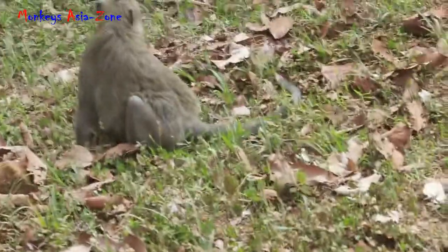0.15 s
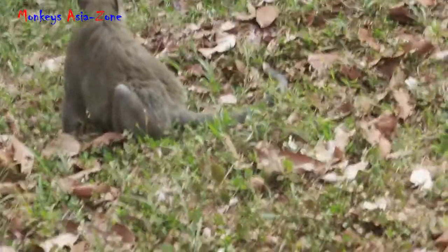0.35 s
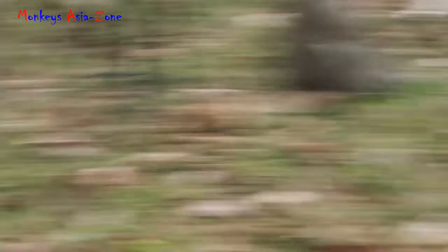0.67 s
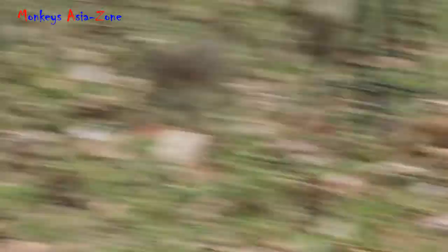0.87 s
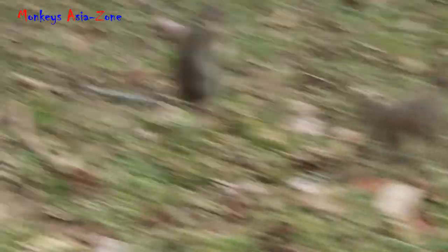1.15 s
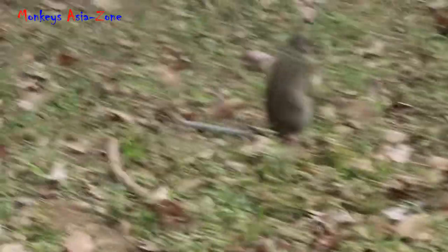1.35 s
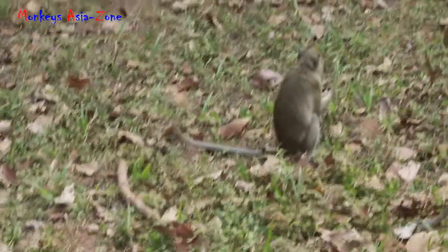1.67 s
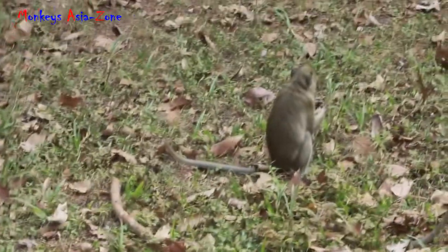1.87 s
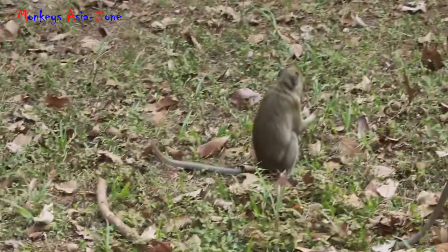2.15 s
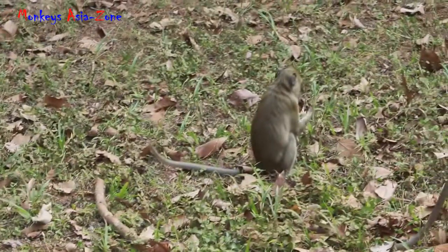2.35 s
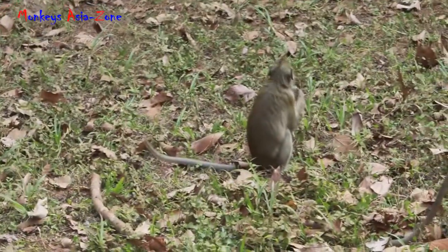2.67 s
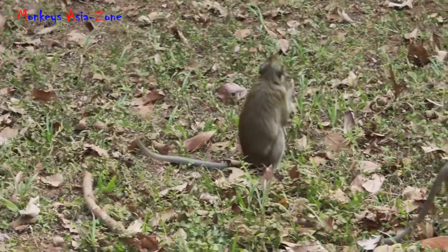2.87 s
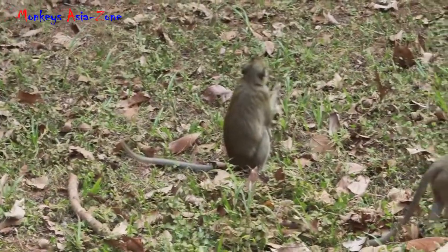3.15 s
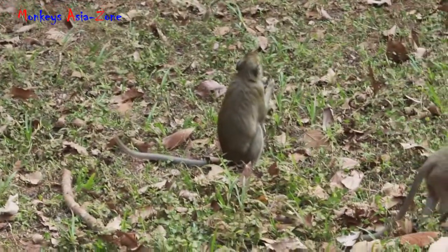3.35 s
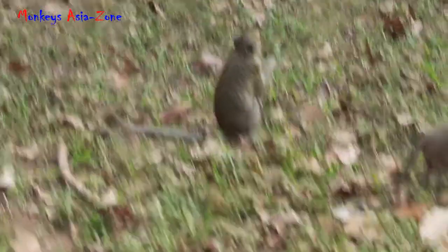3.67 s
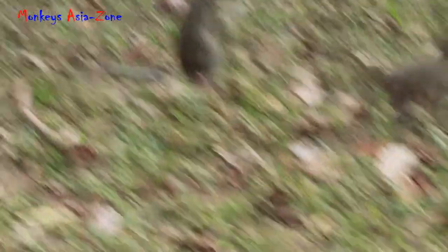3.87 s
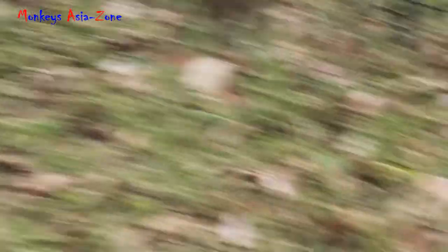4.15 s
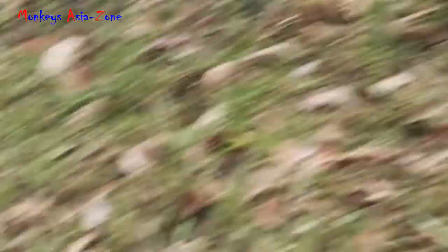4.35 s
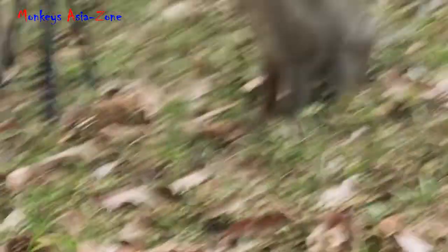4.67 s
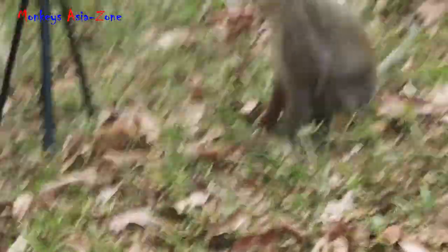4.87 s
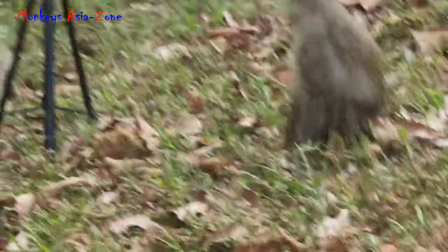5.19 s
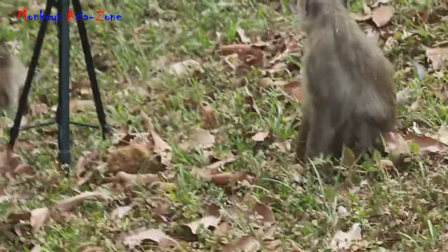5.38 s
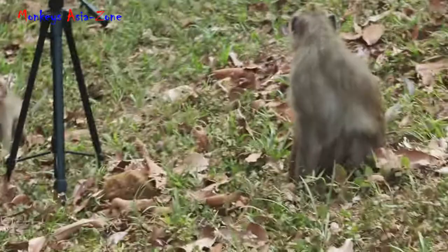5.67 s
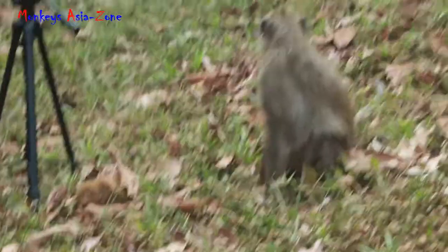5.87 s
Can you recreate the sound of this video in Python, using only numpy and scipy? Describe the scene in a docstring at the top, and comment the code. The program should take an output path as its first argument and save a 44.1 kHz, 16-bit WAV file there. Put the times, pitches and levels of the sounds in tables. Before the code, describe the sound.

A quiet outdoor bed of low rumble, dull thumps and crackling leafy hiss continues for about six seconds, with faint echo from trees. At 0.4 s a short breathy monkey squeal falls away on the left. Soft coos and a thin insect note follow around 0.7-1.1 s, weak barks and a rising coo at 1.5-1.7 s, then a raspy scream at 1.85 s. Tiny low grunts patter at 2.4 s. From 2.67 to 3.17 s comes the longest outburst: piercing, wavering, torn by rasp, dropping sharply at its end, with hiss swelling. A faint yelp at 3.45 s precedes short screams at 3.6-4.15 s and a very high shriek at 4.25-4.4 s. A hollow knock sounds at 4.5 s, with dry snaps until 4.83 s. Coos, a rising nasal whine, gruff barks and a thin squeal occupy 5.15-5.75 s, the barks leftward; a faint insect note ends it. Close handheld stereo microphone.

```python
"""A bed of low rumble and crackling hiss stirs over a lawn; then macaques squabble metres from a hand-held camera.
Their screams are gliding whistles that break to a lower register and tear into rasp, built from sines and shaped noise.
Chirps, coos, a whine and a squeal are bent tones and harmonics; barks and grunts are pulses and puffs through a throat.
Dull low thumps and swells of hiss are shaped noise, something knocks once on ringing modes, an insect sings a thin note,
and the trees around give a faint echo of scattered taps."""
import sys
import numpy as np
from scipy import signal
from scipy.fft import rfft, irfft, next_fast_len
from scipy.io import wavfile
from scipy.ndimage import uniform_filter1d

SR = 44100
rng = np.random.default_rng(int(sys.argv[2]) if len(sys.argv) > 2 else 0)


def generate_wav(signal):
    """Clip the signal to [-1, 1] and save it as 16-bit WAV at the path in sys.argv[1]."""
    frames = np.transpose(np.atleast_2d(signal))
    scaled = np.clip(frames, -1, 1) * 32767
    pcm = np.round(scaled).astype(np.int16)
    wavfile.write(sys.argv[1], SR, pcm)


N = 265471  # length in samples
EDGE_HZ = 15650  # top of the camera's band


def amp(db):
    """Amplitude of a level in dB."""
    return 10 ** (np.asarray(db) / 20)


def evened(x):
    """Sets the rms to 1."""
    return x / np.sqrt(np.mean(x ** 2) + 1e-20)


def read(points, hz):
    """A spectrum joined by straight lines over log frequency."""
    f, value = np.transpose(points)
    return np.interp(np.log(hz + 1), np.log(f + 1), value)


def add(mix, s, sound):
    """Lays a stereo sound into the mix from s seconds on."""
    part = mix[:, max(round(s * SR), 0):][:, :sound.shape[1]]
    part += sound[:, :part.shape[1]]


def coloured(x, gain):
    """Filters x by gain(Hz) and sets its rms to 1."""
    size = next_fast_len(x.shape[-1] + 512)
    spectrum = rfft(x, size) * gain(np.fft.rfftfreq(size, 1 / SR))
    return evened(irfft(spectrum, size)[..., :x.shape[-1]])


def wobble(size, hz):
    """Random motion up to about hz, rms 1."""
    return coloured(rng.standard_normal(size), lambda f: 1 / (1 + (f / hz) ** 4))


def controls(rows):
    """Time and every column of a curve table at audio rate."""
    s, *columns = np.transpose(rows)
    t = np.arange(s[0], s[-1], 1 / SR)
    return [t] + [np.interp(t, s, c) for c in columns]


def fade(size, edge_s):
    """Soft start and stop."""
    t = np.arange(size) / SR
    return np.clip(np.minimum(t, t[::-1]) / edge_s, 0, 1)


def arc(length, first_hz, middle_hz, last_hz):
    """The pitch of a short call bends smoothly through three notes."""
    u = np.linspace(0, 1, int(length * SR))
    return np.polyval(np.polyfit([0, .5, 1], [first_hz, middle_hz, last_hz], 2), u)


def swells(rows):
    """Power of overlapping swells that each rise and fall; rows are (middle s, length s, dB)."""
    t = np.arange(N) / SR
    return sum((amp(db) * np.cos(np.pi * np.clip((t - s) / length, -.5, .5))) ** 2 for s, length, db in rows)


def placed(s, x):
    """Sound from the side reaches one microphone port earlier and louder."""
    # Where the callers are. Each row: time in seconds, lead of the left port in microseconds,
    # left-right level in dB, in full from 4 kHz up.
    bearing = [(.4, 90, 8.5), (1.5, -22, -1), (1.85, -46, 0), (2.67, -49, -1), (3.6, -35.5, -1),
               (3.87, 14, 0), (4.251, 1, 1.5), (5.2, 36, 1), (5.55, 37, 6)]
    at, lead, balance = np.transpose(bearing)
    size = next_fast_len(len(x) + 64)
    f = np.fft.rfftfreq(size, 1 / SR)
    earlier = np.exp(1j * np.pi * f * np.interp(s, at, lead) / 10 ** 6)
    louder = amp(np.interp(s, at, balance) / 2 * np.minimum(f / 4000, 1))
    half = earlier * louder  # each port takes half the difference
    return s, irfft(rfft(x, size) * np.array([half, 1 / half]), size)[:, :len(x)]


def restless_bed(shape, apart, grain, crackles_per_s, restless_db):
    """Stereo hiss and random crackles of uneven size, coloured by a spectrum and restless in level."""
    sizes = amp(4 * np.minimum(rng.exponential(1, (3, N)), 3))
    struck = rng.random((3, N)) < crackles_per_s / SR
    crackles = sizes * rng.choice([-1, 1], (3, N)) * struck
    x = rng.standard_normal((3, N)) + grain * evened(crackles)
    x = x * np.exp(0.11 * wobble(N, 43)) * amp(restless_db * wobble(N, 8.3))
    # one track is common to both ports, the others belong to one port each
    return coloured(x[0] + apart * x[1:], lambda f: amp(read(shape, f)))


def lawn(crackles_per_s=260, crackle=0.5, restless_db=0.58):
    """The bed over the lawn: low rumble, soft hiss and bright crackling hiss, each with its own swells."""
    # Dull low thumps, mostly under the screams. Each row: middle in seconds, length in seconds, level in dB.
    low_thumps = [(.46, 0.13, -48), (.98, 0.1, -58), (2.46, 0.18, -54), (3.04, 0.26, -50),
                  (3.71, 0.14, -48.5), (3.88, 0.16, -55.5), (4.31, 0.072, -44.5), (5.54, 0.14, -57)]
    # Swells of broad hiss, the strongest accompanying the long scream. Each row: middle in seconds,
    # length in seconds, soft hiss in dB, bright hiss in dB.
    hiss_swells = [(0.037, 0.42, -76, -49.5), (0.815, 0.34, -56.5, -50), (1.183, 0.046, -52.5, -71),
                   (1.325, 0.073, -61, -49), (1.557, 0.19, -48.5, -59), (1.955, .4, -57, -41.5),
                   (2.455, 0.16, -50, -46.5), (2.994, 0.36, -49, -29.5), (3.27, 0.33, -56, -43),
                   (3.75, 0.35, -56.5, -37), (4.308, 0.12, -40, -38), (4.59, 0.44, -44.5, -41.5),
                   (5.176, 0.28, -44, -46.5), (5.345, 0.67, -48, -40.5)]
    # Spectrum of the rumble and thumps. Each row: frequency in Hz, level in dB.
    rumble_shape = [(12, -39), (20, -9.5), (65, -5), (108, 3), (145, -1.5), (189, -4.5), (300, -8.5),
                    (390, -34), (660, -120)]
    # Spectrum of the soft hiss. Each row: frequency in Hz, level in dB.
    soft_shape = [(120, -19), (260, 1), (600, 1.5), (1200, -2), (2500, -10.5), (4000, -12.5), (9000, -42)]
    # Spectrum of the bright hiss. Each row: frequency in Hz, level in dB.
    bright_shape = [(800, -8), (2000, 0.5), (4000, 0.5), (6500, -2), (9000, -4), (12000, -7), (14000, -14),
                    (16000, -26)]
    rumble_db, soft_db = -56.5, -54.5  # the bed between swells
    bright_first_db, bright_last_db = -53.5, -45  # the bright hiss grows louder from start to end

    soft_swells = swells((s, length, db) for s, length, db, _ in hiss_swells)
    bright_swells = swells((s, length, db) for s, length, _, db in hiss_swells)
    rumble = np.sqrt(amp(rumble_db) ** 2 + swells(low_thumps))
    soft = np.sqrt(amp(soft_db) ** 2 + soft_swells)
    bright = np.sqrt(amp(np.linspace(bright_first_db, bright_last_db, N)) ** 2 + bright_swells)
    rumble_sound = rumble * restless_bed(rumble_shape, 0.59, 0, crackles_per_s, restless_db)
    soft_sound = soft * restless_bed(soft_shape, 1.0, 0.47, crackles_per_s, restless_db)
    bright_sound = bright * restless_bed(bright_shape, 6.3, crackle, crackles_per_s, restless_db)
    return rumble_sound + soft_sound + bright_sound


def trees(x, near_db=-16, near_t60=0.077, far_db=-16):
    """Quick scatter from ground and trunks, then a faint long tail from the foliage all around."""
    # How long the foliage rings. Each row: frequency in Hz, decay by 60 dB in seconds.
    echo_t60 = [(200, 0.24), (1500, 0.69), (3200, 0.96), (6500, 0.84), (10000, 0.8), (15000, 0.17)]
    # Colour of the foliage. Each row: frequency in Hz, level in dB.
    echo_colour = [(200, -10), (1200, 0.5), (2100, -2), (3100, 3.5), (4200, -2), (6400, 2.5), (8500, -2.5),
                   (15000, -5.5)]
    taps = rng.standard_normal((4, SR)) * (rng.random((4, SR)) < 3000 / SR)
    taps[:, :SR // 300] = 0  # nothing stands close enough to answer sooner
    hz, t, z = signal.stft(taps, SR, nperseg=256)
    decay_db = read(echo_colour, hz)[:, None] - 60 * t / read(echo_t60, hz)[:, None]
    onset = np.minimum(t / 0.019, 1)
    far = signal.istft(z * amp(decay_db) * onset, SR, nperseg=256)[1][:, :SR]
    near = taps[:2] * amp(-60 * np.arange(SR) / SR / near_t60)
    # every port hears the foliage answer both channels
    far_paths = far.reshape(2, 2, SR) / np.linalg.norm(far[:2])
    foliage = signal.fftconvolve(x[None], far_paths, axes=2).sum(1)
    ground = signal.fftconvolve(x, near / np.linalg.norm(near[0]), axes=1)
    return (amp(far_db) * foliage + amp(near_db) * ground)[:, :N]


def insect(s, length, db):
    """A thin note from the grass: one sine with slight random motion in pitch and level."""
    insect_hz = 5700
    size = int(length * SR)
    phase = 2 * np.pi * np.cumsum(insect_hz + 35 * wobble(size, 132)) / SR
    note = np.sin(phase) * np.exp(0.51 * wobble(size, 40))
    return placed(s, amp(db) * evened(note) * fade(size, 0.021))


def snap(s, db, hz, t60=0.018):
    """A dry leaf or twig cracks: a narrow band of noise that dies at once."""
    t = np.arange(SR // 25) / SR
    band = lambda f: 1 / (1 + ((f - hz) / (0.13 * hz)) ** 2)
    crack = coloured(rng.standard_normal((2, len(t))), band) * amp(-60 * t / t60)
    return s, amp(db) * crack / abs(crack).max()


def knock(s, db, scuff_db=-11, scuff_t60=0.093):
    """A dull blow on something hollow: decaying modes with a short scuff of noise."""
    # Ring of the hollow thing. Each row: frequency in Hz, level in dB, decay by 60 dB in seconds.
    modes = [(293, -11.5, 0.077), (372, -4, 0.078), (486, -3.5, 0.11), (744, 4, 0.049), (854, -4, 0.05),
             (1750, -3, 0.068), (2620, -2.5, 0.022)]
    t = np.arange(SR // 5) / SR
    ring = sum(amp(level - 60 * t / t60) * np.sin(2 * np.pi * (hz * t + rng.random()))
               for hz, level, t60 in modes)
    scuff = coloured(rng.standard_normal((2, len(t))), lambda f: 1 / (1 + (f / 1300) ** 2))
    scuff = scuff * amp(scuff_db - 60 * t / scuff_t60)
    return s, amp(db) * (ring / abs(ring).max() + scuff) * fade(len(t), 0.00092)


def bark(row, throat, taper, upper_hz=4080, upper_width_hz=280, arch=0.042):
    """A short burst of uneven pulses and puffs of air through a throat; the pitch arches with the push."""
    s, length, db, first_hz, last_hz, rough, brightness_db, upper_db = row
    size, rough = int(length * SR), np.clip(rough, 0, 1)
    push = signal.windows.tukey(size, taper)
    unsteady = 1 + arch * (push - 1) + 0.082 * rough * wobble(size, 400)
    turns = np.cumsum(np.linspace(first_hz, last_hz, size) * unsteady) / SR
    folds = sum(np.cos(2 * np.pi * k * turns) for k in range(1, 21))
    # air bursts out at the start of each cycle
    puffs = (0.48 + np.exp(-(turns % 1) / 0.36)) * rng.standard_normal(size)
    drive = np.sqrt(1 - rough) * evened(folds) + np.sqrt(rough) * evened(puffs)

    def colour(f):
        upper = upper_db / (1 + ((f - upper_hz) / upper_width_hz) ** 2)
        return amp(read(throat, f) + brightness_db * np.log2(f + 100) + upper)
    return placed(s, amp(db) * coloured(drive * push, colour))


def hum(hz, mouth, throat, closed_slope_db=-10, jitter=0.0138, blur=0.079, patchy_db=2.5):
    """A stack of harmonics: mostly fundamental with the lips closed, a grainy nasal whine with them open."""
    size = len(hz)
    phase = 2 * np.pi * np.cumsum(hz * (1 + jitter * wobble(size, 135))) / SR
    mouth, voice, power = np.clip(mouth, 0, 1), 0, 0
    for k in range(1, 13):
        closed = amp(closed_slope_db * 2 * np.log2(k))
        opened = amp(read(throat, k * hz))
        gain = ((1 - mouth) * closed + mouth * opened) * (k * hz < EDGE_HZ)
        grain = amp(patchy_db * mouth * wobble(size, 57))
        partial = grain * np.sin(k * phase + blur * k * mouth * wobble(size, 400))
        voice, power = voice + gain * partial, power + gain ** 2 / 2
    return voice / np.sqrt(power)


def coo(s, length, db, first_hz, middle_hz, last_hz, mouth, edge_db=-8):
    """A soft call of bending pitch, a hum loudest in the middle."""
    # Throat of the coos. Each row: frequency in Hz, level in dB.
    coo_throat = [(600, -11), (1100, -18), (1650, -2), (1950, -2), (2250, -0.5), (3200, -20), (4150, -1),
                  (5200, -20), (7000, -21), (10000, -19), (15000, -34)]
    hz = arc(length, first_hz, middle_hz, last_hz)
    level = amp(db + edge_db * np.linspace(-1, 1, len(hz)) ** 2)
    return placed(s, level * hum(hz, mouth, coo_throat) * fade(len(hz), 0.009))


def whine(rows, mouth=.92):
    """A nasal call that climbs with the mouth open."""
    # Throat of the whine. Each row: frequency in Hz, level in dB.
    whine_throat = [(600, -7), (1200, -27), (1650, 1), (2100, -9), (2700, 3.5), (3300, -1), (3900, -19),
                    (4500, -6), (5300, -23), (6700, -11), (10000, -15), (15000, -30)]
    t, hz, db = controls(rows)
    voice = hum(hz, mouth, whine_throat, jitter=.008, blur=.05, patchy_db=2.4)
    return placed(t[0], amp(db) * voice * fade(len(t), 0.01))


def whistle(hz, tone_db, octave_db, jitter, shimmer, third_db, half_db):
    """Folds vibrating almost as a sine; unsteady cycles widen the line, alternate strong ones add half lines."""
    size = len(hz)
    phase = 2 * np.pi * np.cumsum(hz * (1 + jitter * wobble(size, 574))) / SR
    partials = [(1, tone_db), (2, octave_db), (3, octave_db + third_db),
                (1 / 2, tone_db + half_db), (3 / 2, tone_db + half_db)]
    voice = sum(amp(db) * (k * hz < EDGE_HZ) * np.sin(k * phase) for k, db in partials)
    return np.sqrt(2) * voice * evened(np.exp(shimmer * wobble(size, 186)))


def chirp(s, length, db, first_hz, middle_hz, last_hz, octave_db, taper=0.73):
    """A brief unsteady whistle that swells and dies along one bend of pitch."""
    hz = arc(length, first_hz, middle_hz, last_hz)
    tone = whistle(hz, db, db + octave_db, jitter=0.033, shimmer=0.35, third_db=-12, half_db=-25)
    return placed(s, tone * signal.windows.tukey(len(hz), taper))


def squeal(rows, first_octave_db=-15, last_octave_db=5):
    """A whistle with no rasp, whose octave grows against its fundamental as it goes on."""
    t, hz, db = controls(rows)
    octave_db = db + np.linspace(first_octave_db, last_octave_db, len(t))
    tone = whistle(hz, db, octave_db, jitter=0.005, shimmer=.12, third_db=-16, half_db=-40)
    return placed(t[0], tone * fade(len(t), 0.005))


def strands(hz, jitter=0.01377, blur=0.64, patchy_db=7.5, quarter_db=-4):
    """Chaotic folds: the cycle doubles twice, leaving ragged lines at quarters of the pitch that glide with it."""
    size, voice = len(hz), 0
    phase = 2 * np.pi * np.cumsum(hz * (1 + jitter * wobble(size, 149.7))) / SR
    for k in np.arange(2, 4 * EDGE_HZ / hz.min()) / 4:
        db = patchy_db * wobble(size, 29.4) + quarter_db * (2 * k % 1 > 0)  # odd quarters differ in level
        line = np.sin(k * phase + blur * wobble(size, 410))
        voice = voice + amp(db) * (k * hz < EDGE_HZ) * line
    return evened(voice * np.sqrt(hz))


def torn(x, patchy_db=3.5, frames_size=7, bins_size=4):
    """Chaos tears a sound into patches about ten milliseconds long and a few hundred Hz wide."""
    z = signal.stft(x, nperseg=256, noverlap=192)[2]
    patches = uniform_filter1d(rng.standard_normal(z.shape), size=frames_size, axis=1)
    patches = evened(uniform_filter1d(patches, size=bins_size, axis=0))
    z = z * amp(patchy_db * np.clip(patches, -2, 2))
    return evened(signal.istft(z, nperseg=256, noverlap=192)[1][:len(x)])


def scream(rows, voice, split_hz=5000, flutter=0.19, break_hz=3300, stray_db=-7, tearing_jitter=0.011):
    """A whistle, pure when high and unsteady when it breaks low; roughness turns its effort into fluttering rasp."""
    # Throat that colours the rasp. Each row: frequency in Hz, level in dB.
    scream_throat = [(200, -11), (900, -10), (1600, -8), (2400, -5), (3200, -4), (3800, -3), (4700, 3),
                     (5500, 3.5), (6500, 7), (7500, 5.5), (9300, 4.5), (10800, -1.5), (13000, -6),
                     (16000, -4.5)]
    attack_s, release_s = .003, 0.0073
    rasp_pivot_hz, rasp_darkens_db_per_octave = 3970, 5  # the lower the pitch, the darker the rasp
    air_hz, air_darkens_db_per_octave = 8500, 1  # the top of the rasp fades further as the pitch falls
    octave_limit_hz = 12400  # the throat damps the octave above this

    t, hz, effort_db, rough = controls(rows)
    hiss, high_jitter, low_jitter, high_octave_db, low_octave_db, low_rasp_db = voice
    size, hiss, rough = len(t), np.clip(hiss, 0, 1), np.clip(rough, .02, .98)
    shares = np.array([1 - rough, rough]) / np.hypot(1 - rough, rough)
    tone_db, rasp_db = effort_db + 20 * np.log10(shares)

    broken = 1 / (1 + (hz / break_hz) ** 6)
    low_register = 1 / (1 + (hz / break_hz / 1.02) ** 14)
    octave_db = effort_db + high_octave_db + low_register * (low_octave_db - high_octave_db)
    octave_db = octave_db - 10 * np.log10(1 + (2 * hz / octave_limit_hz) ** 40)
    # the whistle drops out while the voice jumps between registers
    octaves_per_s = abs(np.gradient(np.log2(hz))) * SR
    held = uniform_filter1d(1 / (1 + (octaves_per_s / 90) ** 4), size=60)
    jitter = high_jitter + low_register * (low_jitter - high_jitter) + tearing_jitter * rough ** 2
    tone = held * whistle(hz, tone_db, octave_db, jitter, 0.17 + 0.2 * broken, third_db=-16, half_db=-36)

    plain_hiss = torn(rng.standard_normal(size))
    drive = np.sqrt(1 - hiss) * strands(hz) + np.sqrt(hiss) * plain_hiss
    drive = drive * np.exp(flutter * wobble(size, 500))
    lower = lambda f: 1 / (1 + (f / split_hz) ** 8)
    darkness = amp(low_rasp_db - rasp_darkens_db_per_octave * np.log2(hz / rasp_pivot_hz))
    treble = amp(rasp_db) / np.hypot(1, darkness)
    dark = darkness * treble * coloured(drive, lambda f: amp(read(scream_throat, f)) * lower(f))
    bright = treble * coloured(drive, lambda f: amp(read(scream_throat, f)) * (1 - lower(f)))
    air = signal.sosfiltfilt(signal.butter(2, air_hz, "high", fs=SR, output="sos"), bright)
    air_loss = 1 - amp(air_darkens_db_per_octave * np.log2(hz / hz.max()))
    s, direct = placed(t[0], tone + dark + bright - air_loss * air)

    # short waves scatter off the grass and reach each port differently
    scatter = lambda f: (1 - lower(f)) / (1 + (f / 12500) ** 8)
    stray = amp(stray_db) * treble * coloured(rng.standard_normal((2, size)), scatter)
    attack = np.minimum((t - t[0]) / attack_s, 1)
    release = np.minimum((t[-1] - t) / release_s, 1)
    return s, (direct + stray) * attack * release


def scene():
    """Every call and small noise, with its echo, over the restless bed of the lawn."""
    # Insect notes. Each row: start in seconds, length in seconds, level in dB.
    insect_notes = [(0.922, 0.17, -55.5), (1.089, .13, -64), (4.983, 0.14, -51.5), (5.893, .2, -52)]
    # Snapping leaves and twigs. Each row: start in seconds, peak in dB, centre in Hz.
    snaps = [(.812, -41, 13150), (4.568, -25, 3230), (4.802, -33, 2400), (4.8246, -31, 3840),
             (4.8295, -25.5, 3700)]
    # Knocks. Each row: start in seconds, peak of the ring in dB.
    knocks = [(4.4934, -16)]
    # Low grunts. Each row: start in seconds, length in seconds, level in dB, first and last pitch in Hz
    # at full push, roughness 0-1, brightness in dB per octave, upper resonance in dB.
    grunts = [(2.366, 0.019, -48, 167, 158, 0.11, 0, 0), (2.4, 0.032, -42, 153.5, 139, 0.11, 0, 0),
              (2.441, 0.04, -44, 138, 128, .1, 0.55, 0), (2.496, 0.034, -49, 133.7, 131, .2, .5, 0)]
    # Throat of the grunts. Each row: frequency in Hz, level in dB.
    grunt_throat = [(60, -6), (140, 5.5), (300, -14), (700, -29), (1050, -6.5), (1400, -31), (1850, -11),
                    (3000, -33), (9000, -50)]
    # Barks, with the same columns and units as the grunts.
    barks = [(1.512, 0.043, -45.5, 591, 520, 0.82, 1.5, -9), (1.554, 0.032, -37.5, 740, 561, 0.42, -1, 5),
             (1.587, 0.031, -36.5, 796, 790, 0.24, 2, 12.5), (3.44, .04, -44.5, 540, 574, 0.82, 3.5, -8),
             (5.471, 0.044, -32, 498.3, 494.4, 0.7, -2.5, 6),
             (5.519, .038, -24.5, 611, 569, 0.78, 0.5, 1.5), (5.579, 0.031, -29, 869, 780, 0.2, 0.5, 0),
             (5.616, 0.028, -34.5, 764, 682, 0.32, -1, 0), (5.726, 0.023, -48, 810, 746, 0.96, 1, -4)]
    # Throat of the barks. Each row: frequency in Hz, level in dB.
    bark_throat = [(200, -15), (700, -18), (1150, -15), (1600, 5.5), (2200, -1.5), (3100, -12.5),
                   (4100, -4.5), (5000, -17), (6200, -11), (8000, -17.5), (11000, -16), (16000, -35)]
    # Coos. Each row: start in seconds, length in seconds, level in dB, first, middle and last pitch in Hz,
    # mouth opening 0-1.
    coos = [(0.689, .15, -53, 541, 626, 635, 0.1), (0.824, 0.22, -48.5, 670, 731, 610, .36),
            (1.619, .145, -45, 615, 752, 976, 0.9), (3.415, 0.074, -45.5, 465, 573, 542, 0.56),
            (5.16, .115, -47, 480, 690, 790, .6), (5.29, .29, -46.5, 662, 885, 600, 0.38)]
    # A long rising whine. Each row: time in seconds, pitch in Hz, level in dB.
    whine_curve = [(5.272, 797, -42), (5.287, 818, -35.5), (5.325, 866, -39.5), (5.358, 1070, -38),
                   (5.385, 1334, -32), (5.425, 1605, -47)]
    # Brief side tones and chirps in and around the screams. Each row: start in seconds, length in seconds,
    # level in dB, first, middle and last pitch in Hz, octave against the fundamental in dB.
    chirps = [(1.979, 0.022, -42.5, 1520, 1086, 600, -12), (2.741, 0.046, -43, 1030, 1457, 2090, -3),
              (2.857, 0.044, -25.5, 3970, 4710, 4660, -3), (2.898, 0.033, -30.5, 2520, 2420, 2340, -12),
              (2.941, .046, -25, 5200, 4430, 3320, -18), (2.945, 0.061, -30, 2350, 2400, 2260, 1),
              (2.989, .033, -21.5, 2300, 1935, 1460, -5.5), (3.564, 0.031, -48.5, 1084, 1166, 1550, -10),
              (3.867, 0.071, -46, 1062, 1230, 890, 10), (4.045, 0.061, -29, 2157, 2190, 2120, -6),
              (4.09, 0.0588, -43.5, 1319, 1078, 1040, -10), (4.098, 0.055, -30.5, 2890, 3020, 2450, -20),
              (4.182, 0.047, -46.5, 1005, 1170, 1680, 1), (4.247, .027, -37, 3180, 3900, 4350, -10),
              (4.268, .056, -27.5, 6800, 6320, 6200, -23), (5.414, .025, -35.5, 2350, 2470, 2580, -22)]
    # A clean squeal. Each row: time in seconds, pitch in Hz, level in dB.
    squeal_curve = [(5.555, 4200, -46), (5.595, 5500, -34), (5.615, 5100, -33.5), (5.652, 4050, -45.5),
                    (5.685, 4280, -39), (5.708, 4040, -44.5), (5.722, 3640, -55)]
    # One table a scream. Each row: time in seconds, pitch in Hz, effort in dB, roughness 0-1.
    screams = [
        [(.406, 4510, -32, .35), (.424, 3930, -28, 0.31), (.435, 4050, -36, .33), (.447, 4150, -26.5, 0.13),
         (.454, 4450, -30, .15), (.461, 3980, -23, 0.11), (.49, 4007, -27, 0.12), (.506, 3240, -42, 0.34),
         (.521, 2170, -43, 0.5), (.538, 1690, -46, .9)],
        [(1.838, 5010, -36, 0.7), (1.86, 5485, -27.5, 0.92), (1.885, 6284, -26.5, 0.52),
         (1.908, 6560, -29, 0.35), (1.951, 5180, -36, 0.55), (1.958, 3123, -33, 0.36),
         (1.975, 2760, -27.5, 0.32), (1.995, 2444, -25, 0.44), (2.015, 1730, -38, 0.54)],
        [(2.671, 2100, -23, 0.1), (2.675, 2330, -16.5, 0.1), (2.683, 3330, -27.5, 0.53),
         (2.7, 5860, -28.5, .55), (2.715, 7220, -24.5, 0.45), (2.745, 7390, -23, 0.31), (2.8, 6930, -29, 0.48),
         (2.835, 6720, -40, .55)],
        [(2.835, 6640, -38.5, 0.5), (2.855, 6520, -27.5, 0.3), (2.875, 6710, -23, .72),
         (2.91, 6310, -23.5, .78), (2.93, 6000, -22, 0.62), (2.958, 5236, -19.5, 0.5),
         (2.982, 5493, -24.5, 0.25), (3.003, 4950, -23, 0.3), (3.025, 5000, -24.5, 0.25),
         (3.052, 5990, -25.5, 0.4), (3.098, 6173, -20.5, 0.26), (3.108, 6880, -14.5, 0.75),
         (3.112, 3516, -16.5, 0.6), (3.123, 3270, -17.5, 0.3), (3.14, 2838, -21.5, 0.22),
         (3.166, 2203, -37, 0.5)],
        [(3.436, 1200, -48, .7), (3.46, 1100, -43, 0.5), (3.468, 2700, -44, 0.7), (3.483, 3150, -36, 0.3),
         (3.506, 2900, -47, .7)],
        [(3.6, 2910, -50, 0.65), (3.645, 5320, -37.5, 0.15), (3.661, 6300, -55, .7), (3.666, 6500, -44, .4),
         (3.67, 6450, -30.5, 0.16), (3.692, 6010, -26.5, 0.44), (3.7, 3240, -27.5, 0.9),
         (3.718, 2976, -23, 0.37), (3.735, 2903, -29, 0.72), (3.774, 2650, -33.5, 0.75),
         (3.781, 2415, -26.5, 0.34), (3.802, 2310, -42, 0.9)],
        [(3.868, 1195, -39, 0.9), (3.885, 1772, -22, 0.36), (3.895, 2157, -29.5, .6), (3.907, 2482, -17, 0.11),
         (3.916, 2986, -21.5, .35), (3.932, 2980, -21, .18), (3.947, 3580, -40, 0.8)],
        [(3.95, 4053, -44, 0.5), (3.99, 5005, -31, 0.23), (4.01, 5510, -28, .42), (4.03, 5107, -28, 0.62),
         (4.05, 4980, -22, 0.65), (4.07, 4183, -22.5, 0.5), (4.087, 3410, -23, 0.6), (4.096, 2297, -22.5, 0.4),
         (4.11, 2033, -17.5, .29), (4.13, 2055, -26, 0.24), (4.157, 1470, -32, 0.5)],
        [(4.244, 6410, -30.5, 0.4), (4.272, 7810, -26.5, 0.68), (4.295, 8340, -19.5, 0.68),
         (4.308, 8360, -17.5, 0.32), (4.319, 7800, -16, 0.5), (4.323, 3480, -24.5, 0.93),
         (4.334, 2677, -17.5, 0.25), (4.343, 2344, -25.5, .52), (4.366, 2638, -27, 0.43),
         (4.378, 2640, -21.5, .3), (4.385, 2040, -28.5, 0.65), (4.397, 1640, -36, .75)],
    ]
    # The voice of each scream, in the same order. Each row: share of the rasp that is plain hiss 0-1,
    # pitch jitter in the high and in the low register as fractions, octave in the high and in the low
    # register in dB, low rasp against high rasp in dB.
    voices = [(0.94, 0.033, .06, -29, -13, 1.5), (0.58, .025, 0.037, -21, 0, -14),
              (0.42, 0.0055, 0.028, -15, -22, -6.5), (0.36, .006, 0.083, 3, -20, -5),
              (.5, .05, 0.073, -13, -6.5, 0), (0.27, .012, 0.058, -26, -12, -6),
              (0.38, .007, 0.022, -22, -12.5, -3), (0.53, 0.0076, 0.027, -16, -16, 4),
              (0.34, 0.015, 0.047, -30, -7.5, -3.5)]

    sounds = [insect(*row) for row in insect_notes]
    sounds += [snap(*row) for row in snaps]
    sounds += [knock(*row) for row in knocks]
    sounds += [bark(row, grunt_throat, taper=0.7) for row in grunts]
    sounds += [bark(row, bark_throat, taper=0.43) for row in barks]
    sounds += [coo(*row) for row in coos]
    sounds += [whine(whine_curve), squeal(squeal_curve)]
    sounds += [chirp(*row) for row in chirps]
    sounds += [scream(rows, voice) for rows, voice in zip(screams, voices)]
    mix = np.zeros((2, N))
    for s, sound in sounds:
        add(mix, s, sound)
    return mix + trees(mix) + lawn()


def record(dry):
    """The colour of the camera's two microphone ports, then its band limit."""
    # The two ports differ. Each row: frequency in Hz, left-right level in dB.
    port_balance = [(900, 0.5), (1800, -1), (3500, -0.1), (7000, 2), (11000, 3.1)]
    size = next_fast_len(N + 512)
    half = amp(read(port_balance, np.fft.rfftfreq(size, 1 / SR)) / 2)
    heard = irfft(rfft(dry, size) * np.array([half, 1 / half]), size)[:, :N]
    band_limit = signal.firwin(511, EDGE_HZ, window=("kaiser", 9), fs=SR)
    return signal.oaconvolve(heard, band_limit[None], "same")


dry = scene()
out = record(dry)
generate_wav(out)
```